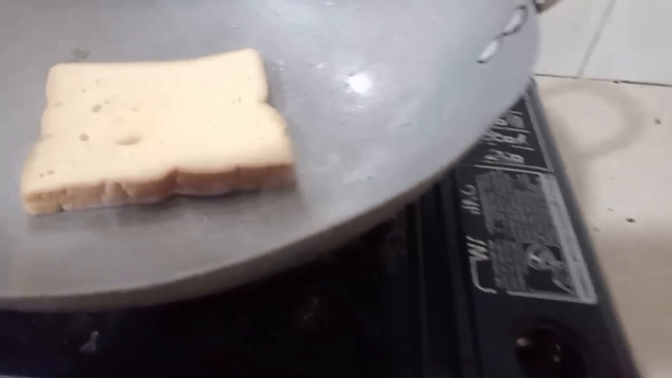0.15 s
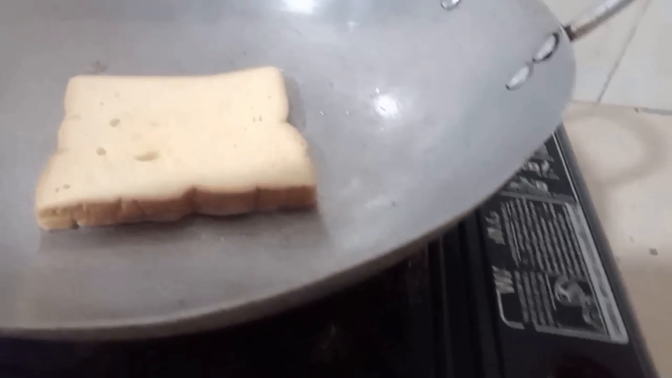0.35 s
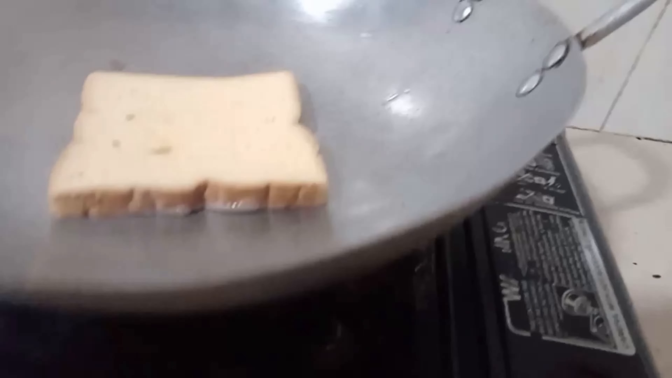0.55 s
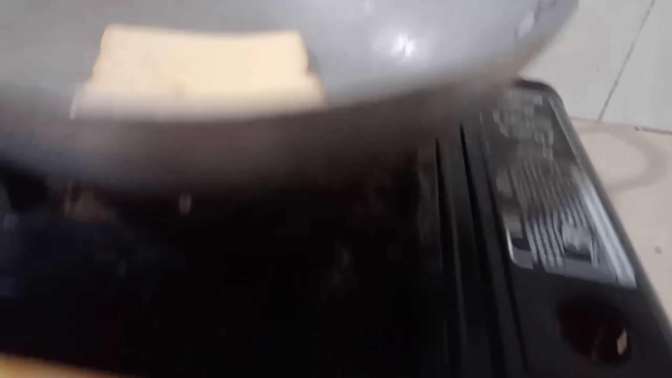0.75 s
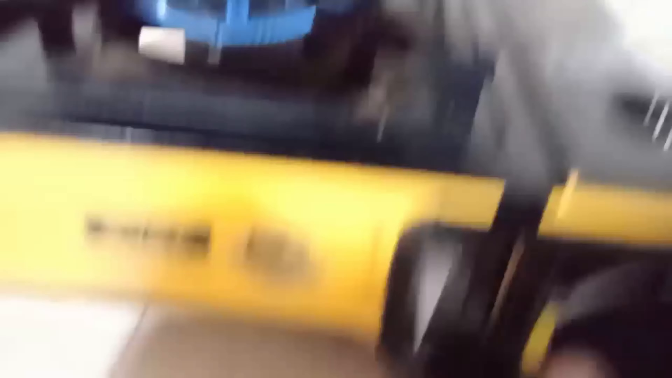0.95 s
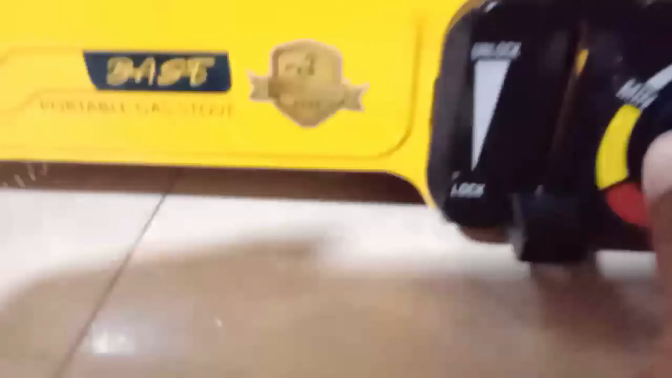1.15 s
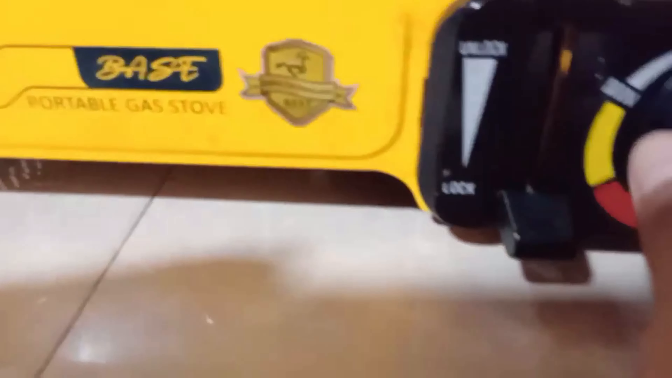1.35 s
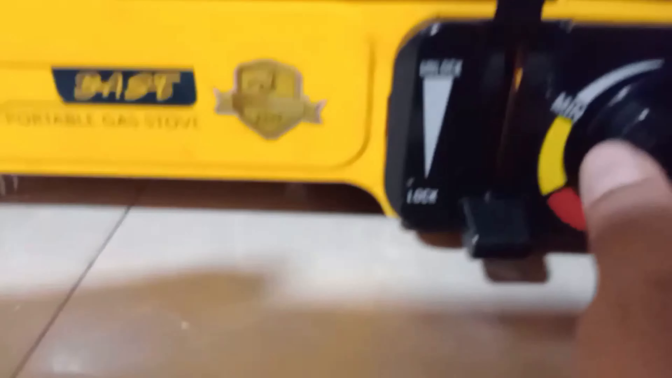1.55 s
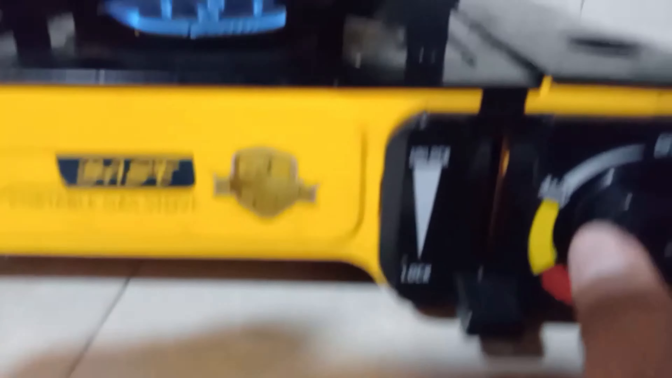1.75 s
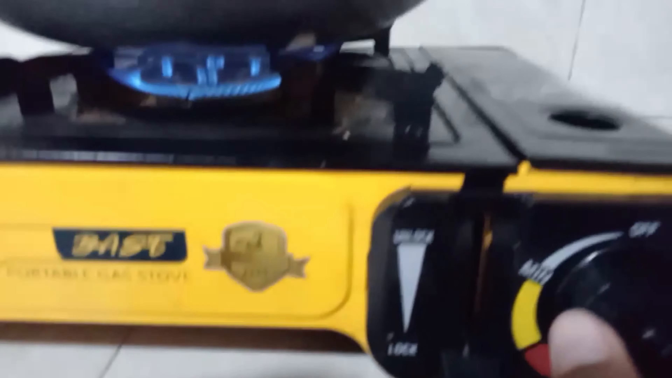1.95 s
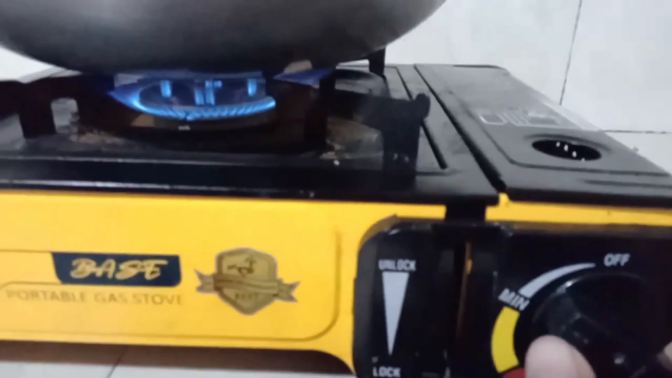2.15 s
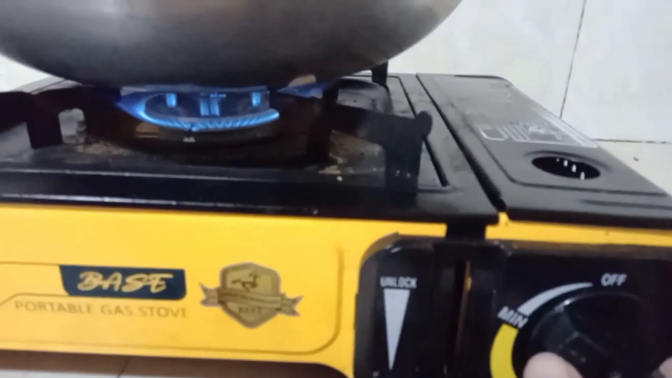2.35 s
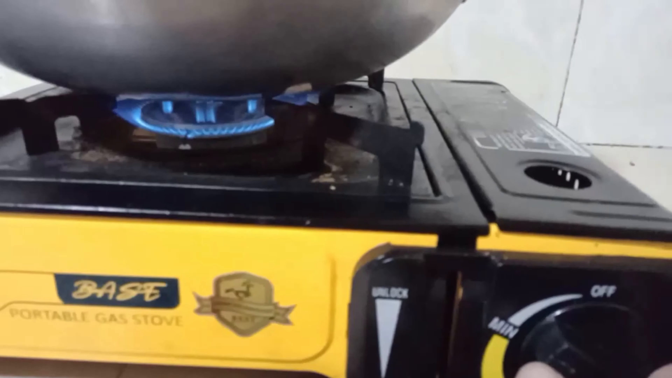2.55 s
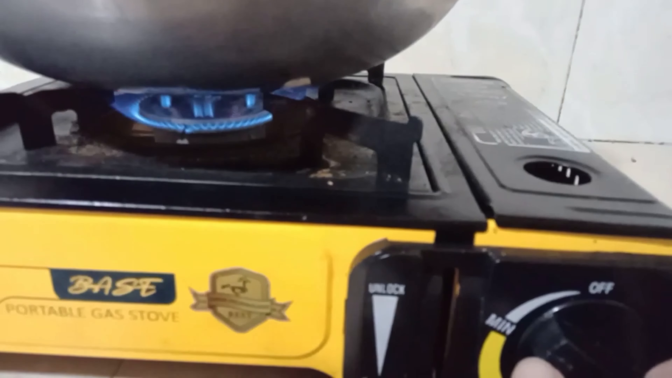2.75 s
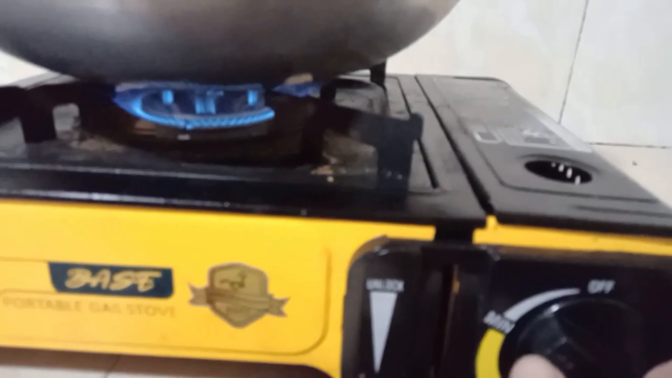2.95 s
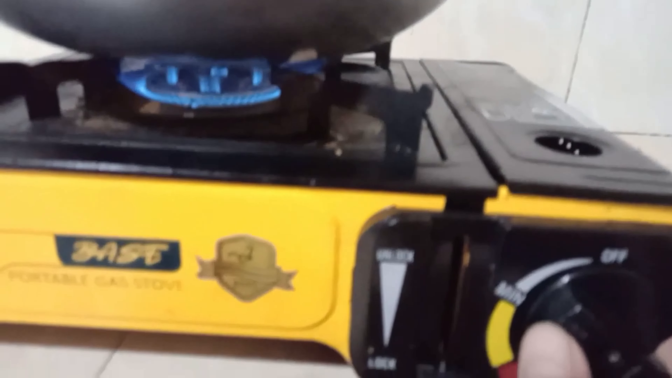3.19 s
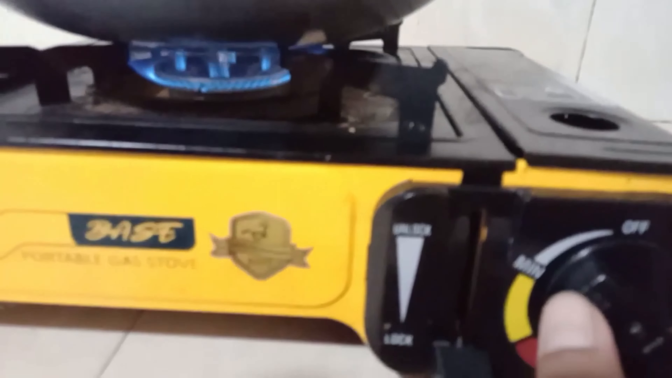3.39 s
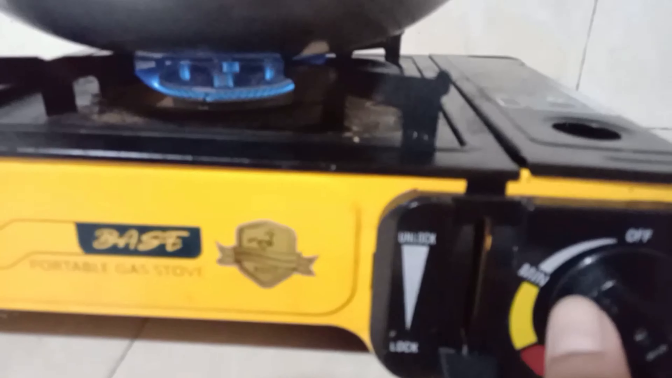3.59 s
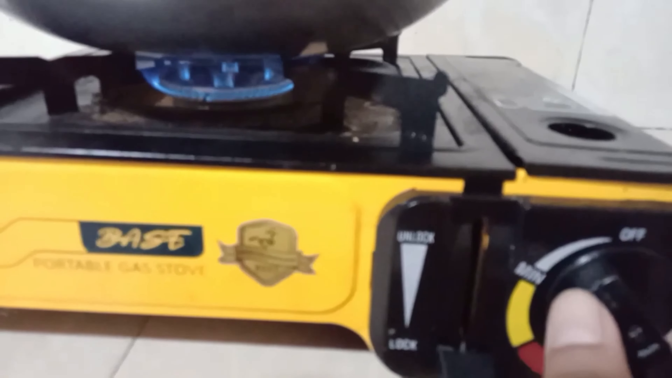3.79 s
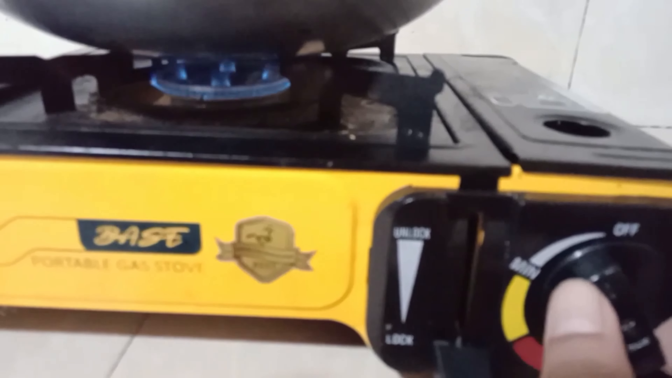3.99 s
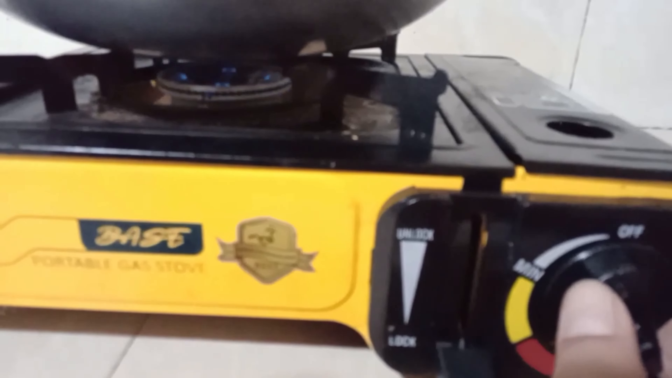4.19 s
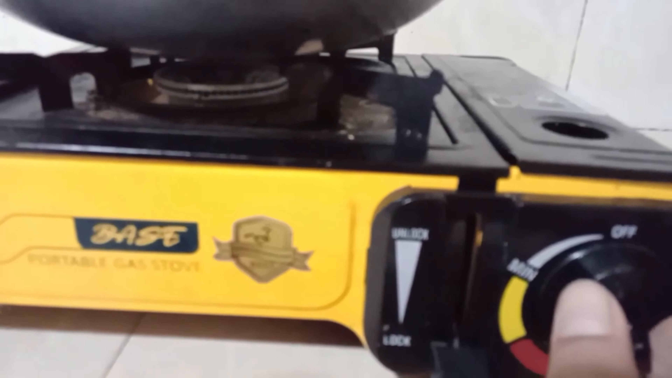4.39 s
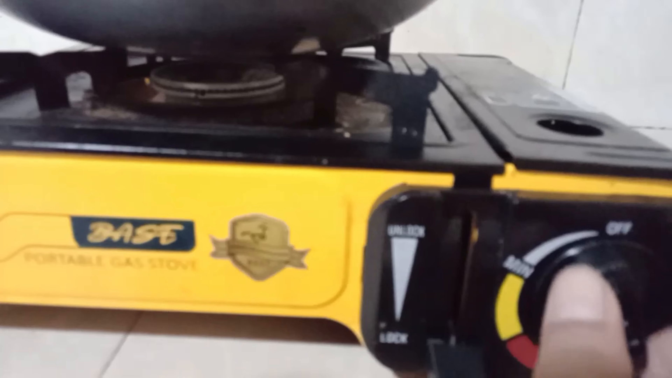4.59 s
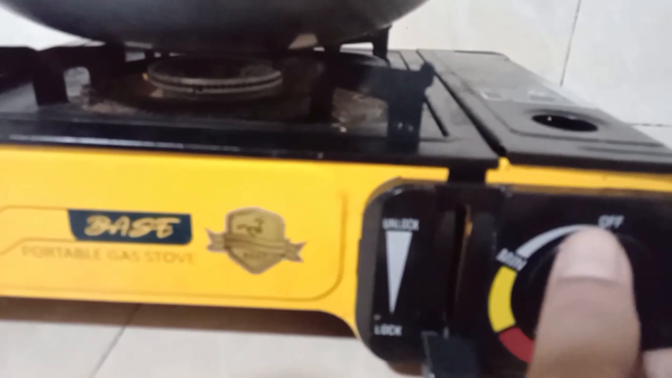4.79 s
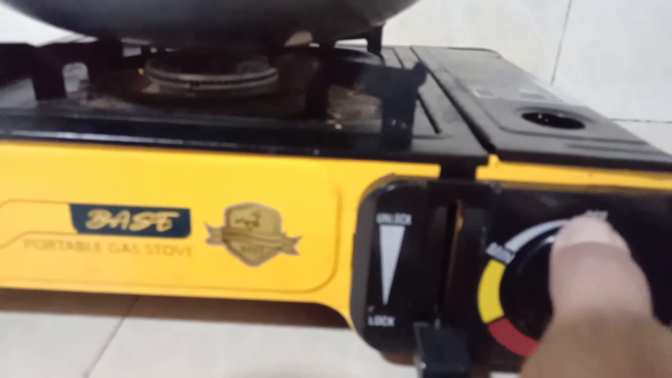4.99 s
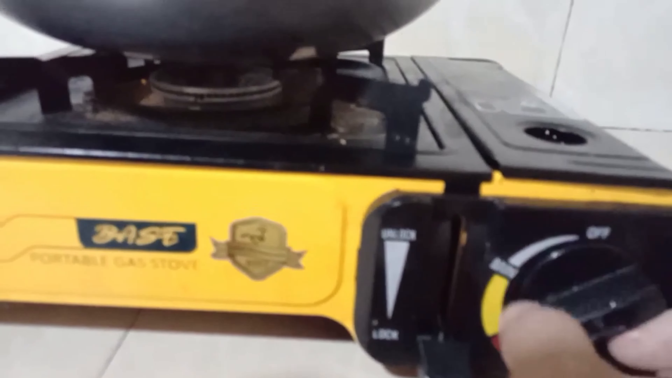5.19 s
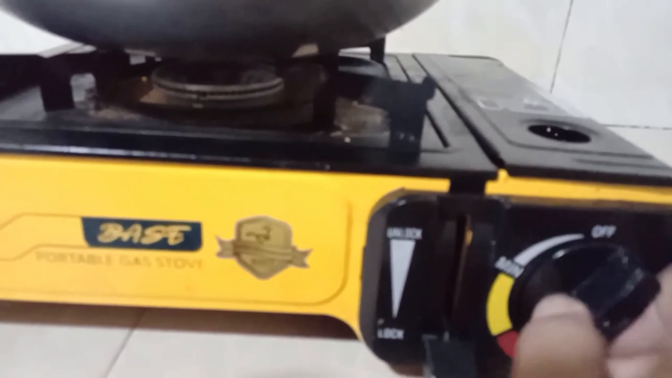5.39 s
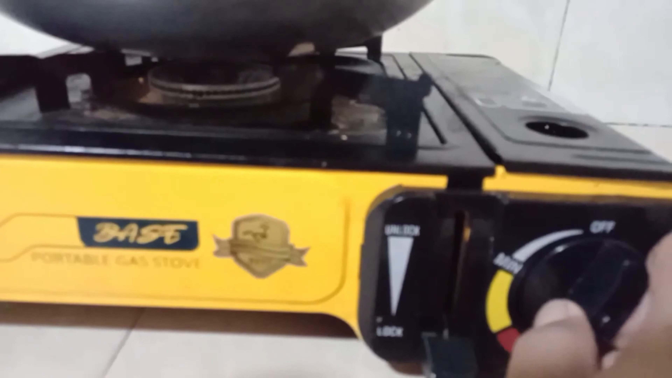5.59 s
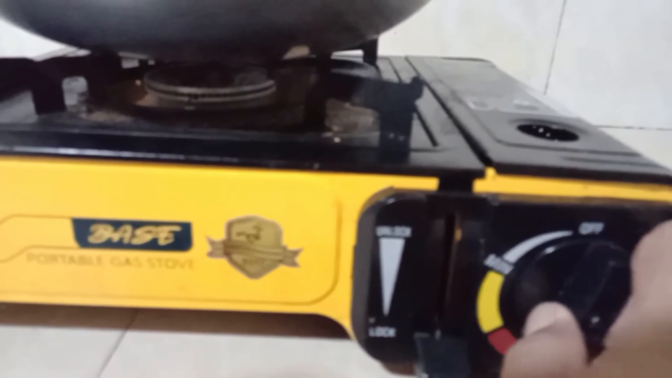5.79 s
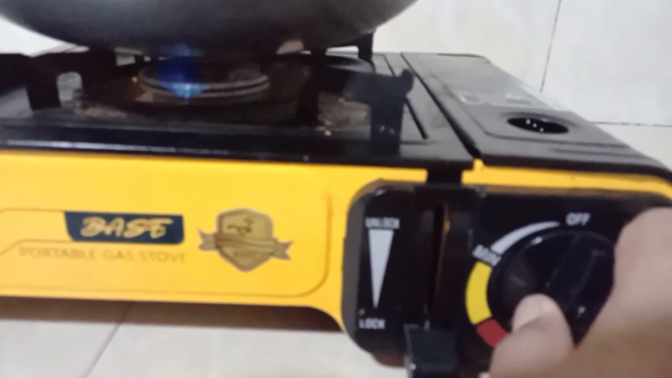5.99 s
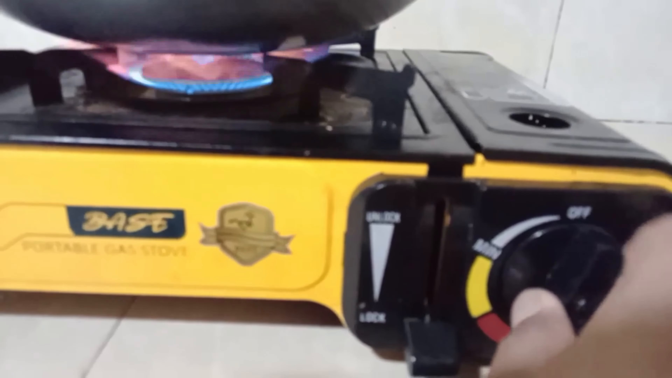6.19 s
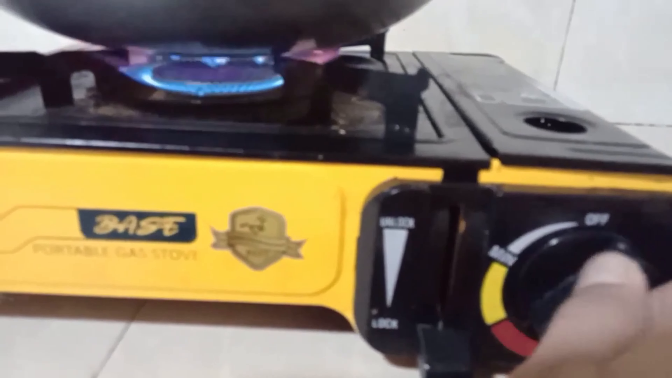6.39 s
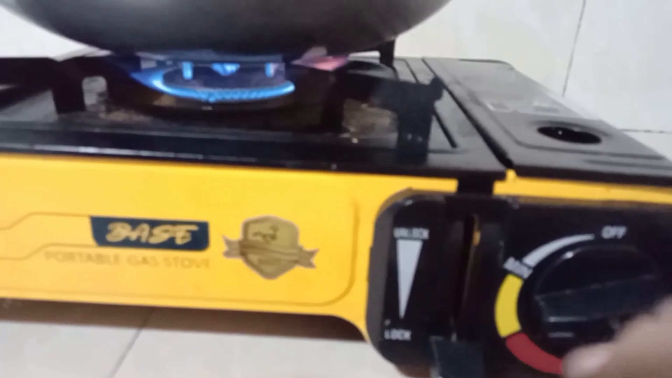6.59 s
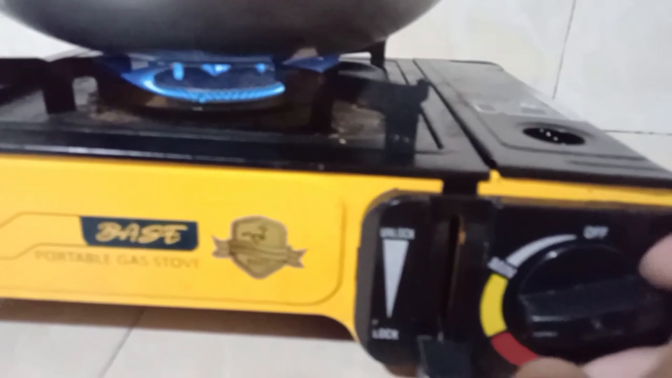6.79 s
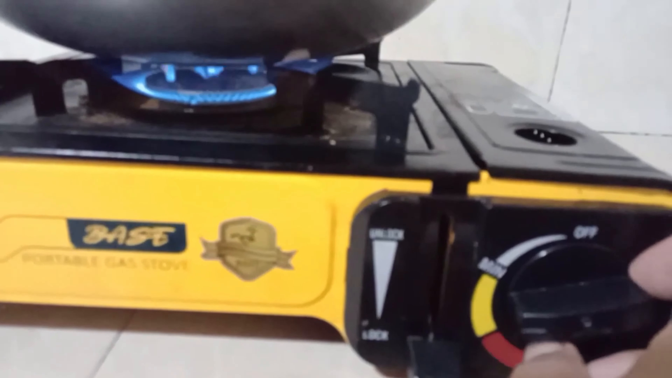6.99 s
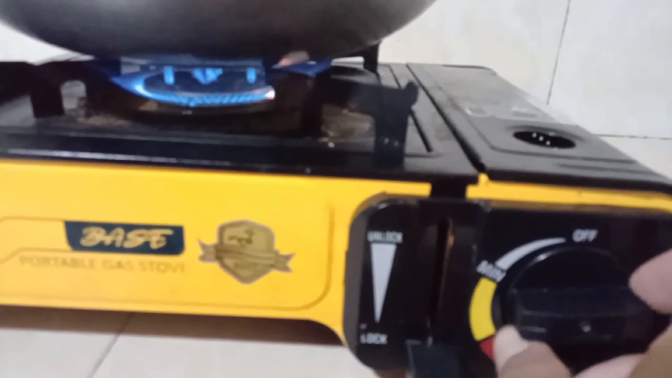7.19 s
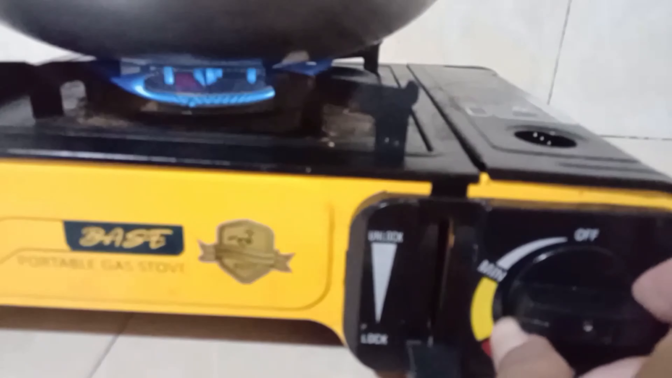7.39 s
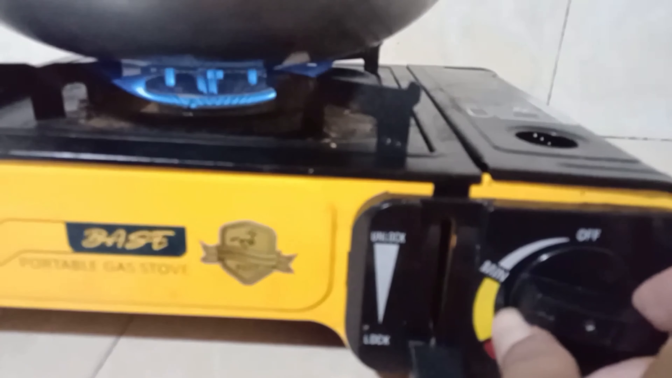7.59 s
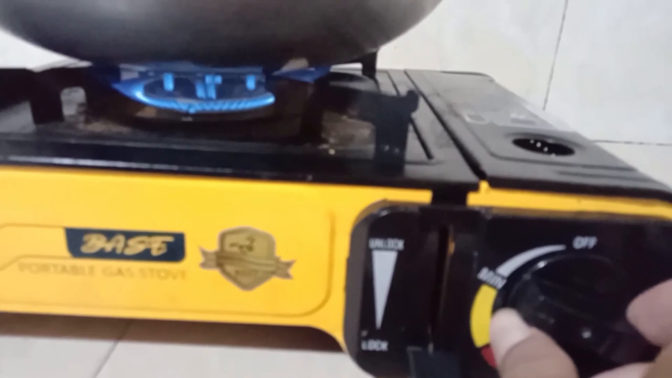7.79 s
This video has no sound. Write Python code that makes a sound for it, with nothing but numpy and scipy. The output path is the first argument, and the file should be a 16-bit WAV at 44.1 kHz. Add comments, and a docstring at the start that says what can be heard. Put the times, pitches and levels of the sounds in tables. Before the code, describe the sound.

In a small tiled kitchen, a handheld microphone first catches loud, spitting fat and sputtering steam, then a steadier, quieter sizzle from beside the stove, with occasional soft puffs and ringing bubbles above a faint wavering hum. A crisp knob click leads to a violent igniter snap with buzzing spring rattle on ringing steel, then gas whooshes alight and settles under the frying, with one or two lighter clicks at the end.

```python
"""A small tiled kitchen with a low hum, where a slice of bread sizzles in a wok on a portable gas stove.
The frying is random crackle and hiss, with pops of fat, spurts of steam and ringing bubbles.
The knob is turned off with a click, then back on: the igniter snaps and rattles as bursts of noise
over ringing steel, and the gas catches with a soft roar of filtered noise.
A small microphone port colours it all, with its strongest peaks near 2, 6 and 11 kHz."""
import sys
import numpy as np
from scipy import signal
from scipy.fft import rfft, irfft
from scipy.io import wavfile

SR = 44100
rng = np.random.default_rng(int(sys.argv[2]) if len(sys.argv) > 2 else 0)


def put_to_file(sound):
    """Save the sound as 16-bit audio at rate SR, in the file named by the first command-line argument."""
    columns = np.atleast_2d(sound).T  # one column per channel
    safe = np.clip(columns, -1, 1)
    whole_steps = np.round(safe * 32767)
    wavfile.write(sys.argv[1], SR, whole_steps.astype(np.int16))


N = 346185

# Levels are relative settings: filters, the room and the microphone port still act on them.
# T60 is the time a sound takes to die away by 60 dB.

# The hum swells now and then. Each row: time of the top in seconds, length in seconds, level in dB.
HUM_SWELLS = [(1.893, 0.44, -45), (4.225, 0.32, -52), (6.09, 0.23, -45), (7.57, 0.24, -46.5)]
# Higher tones of the hum. Each row: pitch in Hz, relative level in dB.
HUM_LINES = [(301, -75), (415, -80.5), (500.5, -73), (619, -82)]
# Faint low tones that come and go. Each row: middle in seconds, length in seconds, pitch in Hz,
# relative level in dB.
FAINT_TONES = [(2.619, 0.093, 253, -64), (2.843, 0.34, 409.5, -66), (4.45, 1, 332, -73.5),
               (4.882, 0.31, 330, -64.5), (5.34, 0.38, 334, -70.5)]
# Spectrum of the still air of the room. Each row: frequency in Hz, relative level in dB.
AIR_SPECTRUM = [(20, -15), (55, -3.5), (90, 5), (140, 5), (220, -3.5), (400, -2.5), (650, -6), (1000, -14),
                (3000, -19.5)]

# Spectrum of the gas flame's roar. Each row: frequency in Hz, relative level in dB.
ROAR_SPECTRUM = [(60, -22), (150, 3), (230, 1), (340, 1), (420, 3), (700, -7.5), (1000, -24), (1600, -22),
                 (3000, -34)]
# Spectrum of the gap between burner and wok. Each row: frequency in Hz, relative level in dB.
BURNER_SPECTRUM = [(300, -55), (460, -5.5), (530, 3), (610, 2), (700, -12), (900, -46), (1500, -51)]
# Resonances of the wok over the flame. Each row: centre in Hz, width in Hz, relative level in dB.
WOK_MODES = [(554, 160, 1.5), (1852, 130, 1)]

# The hammer's blows shake the stove. Each row: start in seconds, relative level in dB, T60 in seconds.
THUMPS = [(6.014, -18.5, 0.074), (6.05, -24.5, 0.14), (6.085, -37, 0.45)]
# Spectrum of those thumps. Each row: frequency in Hz, relative level in dB.
THUMP_SPECTRUM = [(25, -20), (70, -15), (120, -4), (220, -8.5), (290, -5.5), (450, -9), (800, -15),
                  (2000, -25.5)]
# Spectrum of the rattling spring. Each row: frequency in Hz, relative level in dB.
SPRING_SPECTRUM = [(100, -10.5), (700, -4), (950, 5), (1900, 3.5), (2500, -2.5), (3300, 11), (4500, 8.5),
                   (6500, 5), (11000, -7.5), (16000, 1)]
# Ringing notes of the stove's steel. Each row: pitch in Hz, relative level in dB.
STEEL_NOTES = [(145, 1), (283, 5), (945, 0), (1469, -0.5), (1580, -10), (1625, -17), (1773, -6.5),
               (1853, -5.5), (1992, -13), (3057, -1.5), (3600, 0), (4575, -12), (6009, -4), (6282, -18),
               (6640, -5)]

# Clicks of the knob, its valve and the pan support. Each row: start in seconds, tick level in dB,
# casing level in dB, casing T60 in seconds, knob level in dB, knob pitch in Hz.
CLICKS = [(0.742, -22.5, -66, .1, -45, 3340), (0.7537, -25, -75, .1, -53, 3280),
          (0.812, -24.5, -75, .1, -39, 3700), (5.4231, -14, -36, 0.1, -43.5, 2880),
          (6.2264, -12.5, -26, 0.27, -36, 3320), (7.116, -22.5, -56, 0.2, -37, 3600),
          (7.716, -41.5, -56, 0.086, -55, 3800), (7.732, -48, -77, .1, -41, 3330)]
# Resonances of the steel casing. Each row: centre in Hz, width in Hz, relative level in dB.
CASING_MODES = [(574, 200, -11), (940, 90, 4), (1430, 39, 1), (1665, 44, -3.5), (1886, 56, -11.5),
                (2700, 740, -9.5), (5460, 2300, -20)]

# Short ringing notes, mostly from larger bubbles. Each row: start in seconds, pitch in Hz,
# level in dB, T60 in seconds.
BUBBLES = [(0.126, 1870, -39.5, 0.092), (0.28, 1920, -45.5, 0.052), (0.442, 607, -28, 0.11),
           (0.444, 1068, -43, 0.31), (1.06, 626, -39, 0.061), (1.183, 622, -46, 0.11),
           (1.26, 2873, -47.5, 0.11), (3.405, 2290, -49.5, 0.054), (4.22, 615, -46.5, 0.08),
           (4.357, 586, -43.5, 0.12), (4.358, 1820, -45.5, 0.043), (5.056, 1285, -44, 0.2),
           (5.055, 2050, -45.5, 0.023), (5.423, 795, -38.5, 0.11)]

# The loudest spurts of steam from under the bread. Each row: start in seconds, then the relative
# levels in dB of the body, the rasp and the fizz.
PUFFS = [(0.1036, -41, -46, -36), (0.127, -47, -46, -41), (0.1603, -43, -47, -41), (0.256, -37, -47, -34.5),
         (0.379, -37, -48, -36), (0.412, -29.5, -40.5, -32.5), (0.4433, -44, -52, -38),
         (0.51, -32, -51, -37), (0.5377, -34.5, -45.5, -36.5), (1.06, -43.5, -52.5, -48),
         (1.1664, -35, -50.5, -43.5), (1.2563, -41, -49, -44), (1.879, -55, -66, -40),
         (2.3371, -52, -51.5, -47), (2.237, -41, -60, -45), (2.466, -71, -64, -41.5),
         (2.6838, -39.5, -55.5, -44), (2.793, -55, -69, -47), (3.0844, -36.5, -57, -56),
         (3.142, -42, -59, -49), (3.2031, -42.5, -53, -41.5), (3.328, -50, -52, -49), (3.47, -44, -53, -63),
         (3.558, -64, -56, -41.5), (3.6437, -58, -55.5, -44.5), (3.7214, -36, -65, -58),
         (3.7568, -63, -51, -41), (4.0607, -47, -56, -50), (4.355, -35, -62, -41), (4.775, -43, -61, -53),
         (4.815, -45.5, -62, -41.5), (4.9715, -41.5, -53, -45.5), (5.132, -39, -51, -42),
         (5.325, -43, -54, -44.5), (6.6078, -32, -59, -55), (7.196, -58, -51, -41.5)]
# Spectrum of a spurt's body. Each row: frequency in Hz, relative level in dB.
STEAM_SPECTRUM = [(700, -17), (1200, -17), (1850, 11.5), (2300, 0.5), (3200, -12), (5000, -26.5)]
# Spectrum of a spurt's rasp. Each row: frequency in Hz, relative level in dB.
RASP_SPECTRUM = [(1600, -37), (2400, 9.5), (2900, 8), (3800, 12), (4500, 9.5), (5500, -51)]
# Spectrum of the hollow note under the bread. Each row: frequency in Hz, relative level in dB.
HOLLOW_SPECTRUM = [(250, -44.5), (480, -18.5), (610, 7), (760, -11.5), (1300, -34.5)]

# The loudest pops of bursting fat. Each row: start in seconds, relative level in dB.
POPS = [(0.0448, -25), (0.1787, -17.5), (0.195, -22), (0.2179, -17.5), (0.2425, -15.5), (0.311, -23),
        (0.3255, -20.5), (0.3775, -17), (0.3945, -15), (0.4125, -16), (0.4715, -17), (0.493, -18.5),
        (0.5192, -16.5), (0.581, -26), (0.598, -25), (0.609, -21.5), (0.6818, -27), (0.742, -21),
        (0.974, -29), (0.9865, -24.5), (2.0278, -29), (4.5173, -23)]
# Spectrum of the pops, also used for the hammer's blow. Each row: frequency in Hz, relative level in dB.
CRACK_SPECTRUM = [(300, -25), (1000, -7), (3000, -18), (5000, 13), (7000, 3), (8500, 5.5), (12000, -3),
                  (16000, 9)]

# The frying is loud while the microphone is over the wok, then steadier from beside the stove.
# Each row: time in seconds, level in dB.
SIZZLE_LEVEL = [(0.0, -40.5), (0.37, -39.5), (0.9, -45.5), (1.6, -47.5), (5.9, -46.5), (6.35, -50),
                (6.7, -48), (7.85, -48)]
# Spectrum of the frying fat. Each row: frequency in Hz, relative level in dB.
FAT_SPECTRUM = [(200, -36), (600, -8.5), (1200, -13), (1900, -12.5), (2600, -13.5), (4300, -8), (5300, 4.5),
                (7000, -4.5), (8400, -6), (11000, -3.5), (13500, -6.5), (15500, -1)]

# How long the tiled kitchen rings. Each row: frequency in Hz, T60 in seconds.
KITCHEN_T60 = [(200, 0.2), (2000, 0.15), (6000, 0.1), (14000, 0.034)]
# Colour of the microphone port. Each row: frequency in Hz, relative level in dB.
PORT_SPECTRUM = [(1100, -14), (1500, -8.5), (1740, -1.5), (1900, 1.5), (2250, -11), (3200, -9), (4400, -14),
                 (5300, -7.5), (6500, 1.5), (7400, -7.5), (8300, -22.5), (10900, -5), (13600, -24),
                 (15300, -16.5)]

TOP_HZ = 15950  # the band limit of the microphone

# the low hum, how far it wavers, and a weaker neighbour that beats with it
HUM_HZ, HUM_DB, HUM_WAVER_DB = 100.5, -57, 2.5
BEAT_HZ, BEAT_DB = 3.5, -4.5
# the gas catches, the pooled gas flares up and is spent, and the flame then falls steadily
LIGHT_S, LIGHT_RISE_S, FLARE_END_S = 6.225, 0.04, 0.0093
ROAR_DB, ROAR_FLARE_DB, ROAR_FLARE_S, ROAR_SETTLE_DB_PER_S = -46.5, 7.5, 0.236, 10.5
BURNER_DB, BURNER_FLARE_DB, BURNER_FLARE_S, BURNER_SETTLE_DB_PER_S = -53, 13, 0.44, 9
FLUTTER_DB, FLUTTER_PER_S = 3, 18
# the igniter's spring rattles from the hammer's blow until it is caught, fading ever faster
STRIKE_S, CAUGHT_S = 6.0125, 6.211
RATTLE_DB, RATTLE_FALL_DB, RATTLE_BEND, RATTLE_EDGE_S = -24.5, 15, 2.7, 0.0035
# every spurt carries a hollow note, this far from its body
HOLLOW_DB = -9.5
# the faint spurts: how many a second, each part's setting relative to the frying, scatter
SMALL_PUFFS_PER_S, SMALL_PUFF_SPREAD_DB = 5, 0
SMALL_BODY_DB, SMALL_RASP_DB, SMALL_FIZZ_DB = -8, -11, 2
# the small pops: how many a second, scatter around the frying's level
SMALL_POPS_PER_S, SMALL_POP_SPREAD_DB = 4, 2
# the wok's resonance: level beside the stove, and how strongly it follows the frying's swings
WOK_DB, WOK_FOLLOWS = -82.5, 1.7


def amp(db):
    """Turns decibels into gain."""
    return 10 ** (np.asarray(db) / 20)


def unit(x):
    """Scales a sound to an average (rms) size of 1."""
    return x / np.sqrt(np.mean(np.abs(x) ** 2) + 1e-20)


def along(points, hz):
    """Reads (Hz, value) points, joined by straight lines on a log frequency axis."""
    point_hz, values = np.transpose(points)
    return np.interp(np.log(hz + 1), np.log(point_hz), values)


def clock():
    """Gives the time of every sample in seconds."""
    return np.arange(N) / SR


def curve(rows):
    """Joins (seconds, value) rows by straight lines."""
    return np.interp(clock(), *np.transpose(rows))


def noise(size=N):
    """Makes white noise of rms 1."""
    return rng.standard_normal(size)


def wobble(rate, size=N):
    """Makes a smooth random curve through `rate` random points a second."""
    knots = rng.standard_normal(int(size * rate / SR) + 4)
    fine = signal.resample(knots, 6 * len(knots))
    return np.interp(np.arange(size) * (6 * rate / SR), np.arange(len(fine)), fine)


def filtered(x, response, size=4096):
    """Filters x with a complex response given as a function of frequency."""
    impulse = irfft(response(np.fft.rfftfreq(size, 1 / SR)))
    return signal.oaconvolve(x, impulse)[:len(x)]


def coloured(x, points):
    """Gives x this spectrum without smearing it backwards in time; white noise keeps its level."""
    def response(hz):
        cepstrum = irfft(np.log(unit(amp(along(points, hz)))))
        # folding the cepstrum puts the filter's energy as early as possible
        cepstrum[1:len(hz) - 1] *= 2
        cepstrum[len(hz):] = 0
        return np.exp(rfft(cepstrum))
    return filtered(x, response)


def resonated(x, modes):
    """Passes x through (Hz, width, dB) resonances; white noise keeps its level."""
    def response(hz):
        total = 0
        for k, (centre, width, db) in enumerate(modes):
            damping = 1j * hz * width
            peak = amp(db) * damping / (centre * centre - hz * hz + damping)
            total = total + (-1) ** k * peak  # neighbours alternate in sign
        return unit(total)
    return filtered(x, response)


def fade(t60, attack, size=SR // 3):
    """Makes an envelope that rises quickly and dies away; both times are in seconds."""
    t = np.arange(size) / SR
    return (1 - np.exp(-t / attack)) * np.exp(-np.log(1000) * t / t60)


def grains(rate, spread_db, size=N):
    """Makes tiny random clicks of uneven size, about `rate` a second, rms 1."""
    sign = np.sign(noise(size))
    present = rng.random(size) < rate / SR
    height = amp(spread_db * np.clip(noise(size), -2, 2))
    return unit(present * sign * height)


def tone(hz, drift, rate, size=N):
    """Makes a sine whose phase wanders at random, typically by `drift` radians."""
    return np.sin(2 * np.pi * hz * np.arange(size) / SR + drift * wobble(rate, size))


def add(track, s, sound):
    """Mixes a sound into a track, starting at s seconds."""
    part = track[int(s * SR):][:len(sound)]
    part += sound[:len(part)]


def bursts(rows, shape):
    """Places the same envelope at every (seconds, dB) row."""
    out = np.zeros(N)
    for s, db in rows:
        add(out, s, amp(db) * shape)
    return out


def chance_events(per_s, spread_db):
    """Makes random (seconds, dB) events, loosely spaced, whose level follows the frying."""
    draw = rng.random((int(per_s * N / SR), 2))
    s = (np.arange(len(draw)) + draw[:, 0]) / per_s
    scatter = spread_db * np.sqrt(3) * (2 * draw[:, 1] - 1)
    return np.column_stack([s, np.interp(s, *np.transpose(SIZZLE_LEVEL)) + scatter])


def kitchen(x, wet_db):
    """Adds the short answer of the tiles: noise that dies away at its own speed in each band."""
    hz, t, bands = signal.stft(rng.standard_normal(SR // 2), SR, nperseg=256)
    decay = np.exp(-np.log(1000) * t / along(KITCHEN_T60, hz)[:, None])
    tail = signal.istft(bands * decay, SR, nperseg=256)[1]
    tail[:SR // 300] = 0  # the answer starts after about 3 ms
    return x + amp(wet_db) * signal.fftconvolve(x, tail / np.linalg.norm(tail))[:N]


def widened(x, side_db):
    """Spreads a sharp sound by setting the channels slightly out of step in the treble."""
    treble = signal.sosfiltfilt(signal.butter(4, 4600, "high", fs=SR, output="sos"), x)
    side = amp(side_db) * np.gradient(treble)
    return np.array([x + side, x - side])


def background():
    """A wavering hum beats with a close neighbour, among a few faint tones and the still air of the room."""
    swells, tones = np.zeros((2, N))
    for s, length, db in HUM_SWELLS:
        add(swells, s - length / 2, amp(db) * np.hanning(int(length * SR)))
    steady = amp(HUM_DB + HUM_WAVER_DB * wobble(10))
    hum = (steady + swells) * tone(HUM_HZ, drift=0.93, rate=12)
    neighbour = amp(BEAT_DB) * steady * tone(HUM_HZ + BEAT_HZ, drift=1.02, rate=14)
    lines = sum(amp(db) * tone(hz, drift=0.81, rate=8.7) for hz, db in HUM_LINES)
    lines = amp(7.0 + 2.5 * wobble(5)) * lines
    for s, length, hz, db in FAINT_TONES:
        size = int(length * SR)
        swell = amp(db + 12.5) * np.hanning(size)
        add(tones, s - length / 2, swell * tone(hz, drift=1.0, rate=44.0, size=size))
    air = amp(-60.5 + 1.8 * wobble(10)) * coloured(noise(), AIR_SPECTRUM)
    return hum + neighbour + lines + tones + air


def flame():
    """The gas catches with a fluttering roar; the gap between burner and wok resonates, then the flame settles."""
    age = np.maximum(clock() - LIGHT_S, 0)
    lit = np.minimum(age / LIGHT_RISE_S, 1)

    def flaring(length):
        """The flare grows from 0 towards 1, then ends when the pooled gas is spent."""
        return np.sqrt(age / length) * (1 - np.tanh((age - length) / FLARE_END_S)) / 2

    roar_db = ROAR_DB + ROAR_FLARE_DB * flaring(ROAR_FLARE_S) - ROAR_SETTLE_DB_PER_S * age
    burner_db = BURNER_DB + BURNER_FLARE_DB * flaring(BURNER_FLARE_S) - BURNER_SETTLE_DB_PER_S * age
    roar = amp(roar_db + FLUTTER_DB * wobble(FLUTTER_PER_S)) * coloured(noise(), ROAR_SPECTRUM)
    burner = amp(burner_db + FLUTTER_DB * wobble(FLUTTER_PER_S)) * coloured(noise(), BURNER_SPECTRUM)
    wok = amp(-58 - ROAR_SETTLE_DB_PER_S * age) * resonated(noise(), WOK_MODES)
    return lit * (roar + burner + wok)


def igniter():
    """The sprung hammer strikes, thumps the stove and leaves its spring rattling against the ringing steel."""
    ring, blows = np.zeros((2, N))
    notes = sum(amp(db) * tone(hz, drift=0.56, rate=27.7, size=SR // 2) for hz, db in STEEL_NOTES)
    add(ring, STRIKE_S, unit(notes))
    chatter = coloured(grains(rate=5000, spread_db=-0.5), SPRING_SPECTRUM)
    # the spring is free between the strike and the catch, with short soft edges
    free = np.clip(np.minimum(clock() - STRIKE_S, CAUGHT_S - clock()) / RATTLE_EDGE_S, 0, 1)
    spent = np.clip((clock() - STRIKE_S) / (CAUGHT_S - STRIKE_S), 0, 1)
    rattle_level = free * amp(RATTLE_DB - RATTLE_FALL_DB * spent ** RATTLE_BEND)
    rattle = rattle_level * (amp(-1.5 + 0.64 * wobble(200)) * chatter + amp(-9.0) * ring)
    for s, db, t60 in THUMPS:
        add(blows, s, amp(db) * fade(t60, attack=0.0013))
    thumps = amp(3.5) * coloured(blows * noise(), THUMP_SPECTRUM)
    # the blow and its rebound
    strike = bursts([(6.0137, -11), (6.0205, -27)], fade(t60=0.027, attack=0.0011)) * noise()
    return widened(coloured(strike, CRACK_SPECTRUM), side_db=-6) + rattle + thumps


def clicks():
    """A hard tick sets the steel casing and the plastic knob ringing; the grip shifts the knob's pitch."""
    out = np.zeros(N)
    tick, quick = fade(t60=0.011, attack=0.00052), fade(t60=0.17, attack=0.00023)
    size = len(tick)
    for s, tick_db, casing_db, casing_t60, knob_db, knob_hz in CLICKS:
        tick_sound = tone(5510, drift=1.0, rate=1100, size=size) + amp(-8.0) * noise(size)
        snap = amp(tick_db) * tick * tick_sound
        casing_push = amp(casing_db) * fade(casing_t60, attack=0.00059) * noise(size)
        casing = resonated(casing_push, CASING_MODES)
        knob_push = amp(knob_db) * quick * grains(rate=2200, spread_db=-3.5, size=size)
        knob = resonated(knob_push, [(knob_hz, 260, 0), (5900, 800, -4)])
        add(out, s, snap + casing + knob)
    return kitchen(out, wet_db=-11.5)


def bubbles():
    """A larger bubble rings briefly at an unsteady pitch."""
    rings = np.zeros(N)
    for s, hz, db, t60 in BUBBLES:
        shape = fade(t60, attack=0.00069)
        add(rings, s, amp(db) * shape * tone(hz, drift=0.78, rate=170, size=len(shape)))
    return kitchen(rings, wet_db=-8)


def spurts():
    """Steam escapes in short sputters, with a rasp and a hollow note from the gap under the bread."""
    puff = fade(t60=0.05, attack=0.0019)
    faint = [(s, db + SMALL_BODY_DB, db + SMALL_RASP_DB, db + SMALL_FIZZ_DB)
             for s, db in chance_events(SMALL_PUFFS_PER_S, SMALL_PUFF_SPREAD_DB)]
    s, *levels = np.transpose([*PUFFS, *faint])
    body, rasp, fizz = (bursts(zip(s, db), puff) for db in levels)
    sputter = grains(rate=3000, spread_db=5.5)  # shared by the body and the fizz
    steam = coloured(amp(-11.5) * body * sputter, STEAM_SPECTRUM)
    steam += coloured(amp(4.5) * rasp * noise(), RASP_SPECTRUM)
    steam += coloured(amp(6.0) * fizz * sputter, FAT_SPECTRUM)
    hollow = coloured(amp(HOLLOW_DB) * body * noise(), HOLLOW_SPECTRUM)
    return kitchen(steam + hollow, wet_db=-5.5)


def cracks():
    """Each drop of fat bursts with one sharp pop inside a few milliseconds of spray; some are brighter."""
    out = np.zeros(N)
    shape = fade(t60=0.014, attack=0.0016, size=SR // 40)
    for s, db in [*POPS, *chance_events(SMALL_POPS_PER_S, SMALL_POP_SPREAD_DB)]:
        burst = amp(2) * shape * noise(len(shape))
        burst[SR // 1000] += amp(-3)  # the sharp pop, 1 ms into the spray
        brightness = rng.uniform(0, .75)
        add(out, s, amp(db) * np.convolve(burst, [1, -brightness]))
    return kitchen(coloured(out, CRACK_SPECTRUM), wet_db=-8.5)


def sizzle():
    """Countless tiny bursts merge into a hiss; a few stand out as ticks, and the wok resonates under them."""
    level = curve(SIZZLE_LEVEL)
    fizz = amp(-5.5 + 0.59 * wobble(30) + 0.26 * wobble(9.2)) * grains(rate=7000, spread_db=3)
    ticks = amp(-11.0) * grains(rate=160, spread_db=6.0)
    frying = coloured(amp(level) * (fizz + ticks), FAT_SPECTRUM)
    wok_db = WOK_DB + WOK_FOLLOWS * (level - np.median(level)) + 3.7 * wobble(13)
    wok = amp(wok_db) * resonated(noise(), [(534, 200, 1.2), (1900, 160, 0.26)])
    return kitchen(wok + frying, wet_db=-9.0)


def scene():
    """Steady sounds sit in the middle; only the sharp ones have some width."""
    middle = background() + flame() + bubbles() + spurts() + sizzle()
    return middle + igniter() + widened(clicks(), side_db=-45) + widened(cracks(), side_db=-22)


def record(dry):
    """The microphone port colours everything, peaks are rounded off and the top of the treble is cut."""
    x = np.array([coloured(channel, PORT_SPECTRUM) for channel in dry])
    x = x / np.sqrt(np.sqrt(1 + np.square(np.square(x / .45))))  # no peak leaves this step above 0.45
    low_pass = signal.firwin(801, TOP_HZ, fs=SR)
    return signal.oaconvolve(x, low_pass[None], "same", axes=1)


dry = scene()
out = record(dry)
put_to_file(out)
```